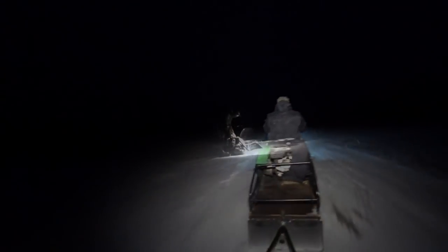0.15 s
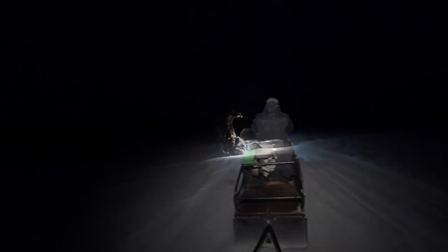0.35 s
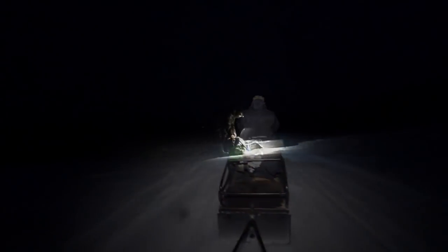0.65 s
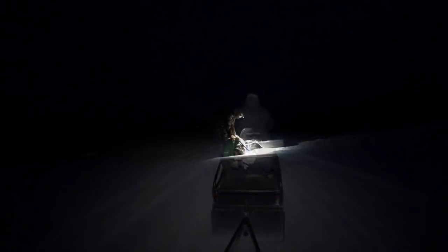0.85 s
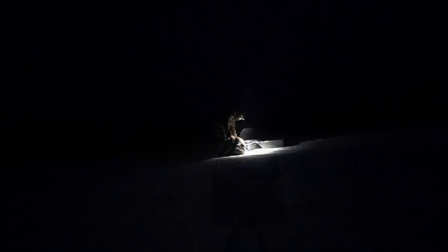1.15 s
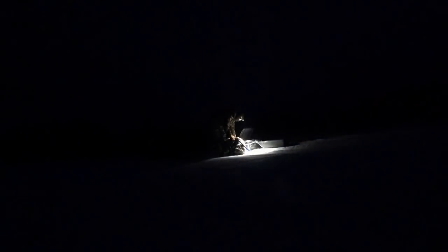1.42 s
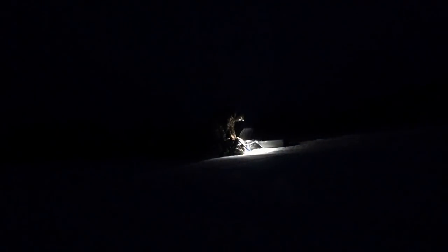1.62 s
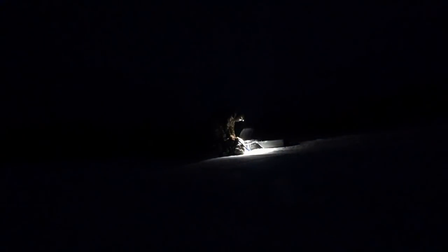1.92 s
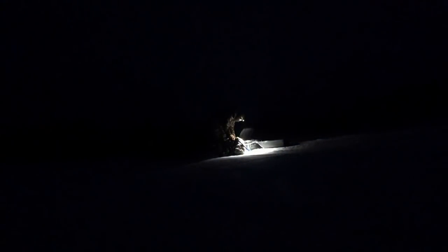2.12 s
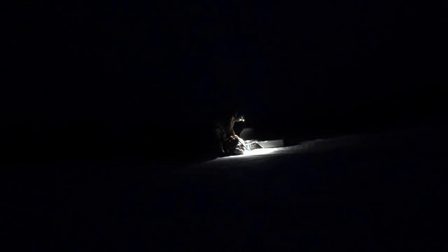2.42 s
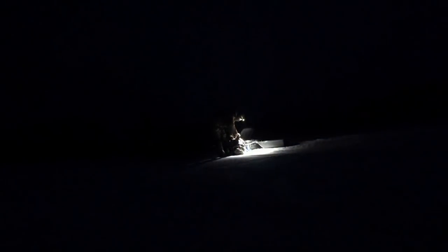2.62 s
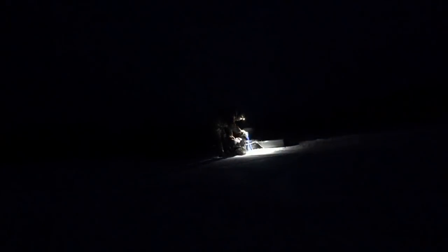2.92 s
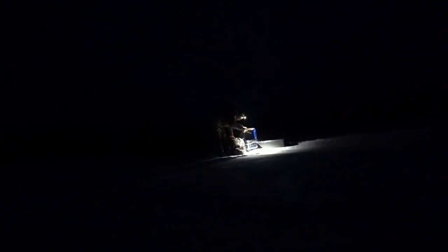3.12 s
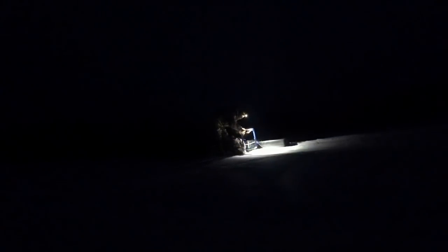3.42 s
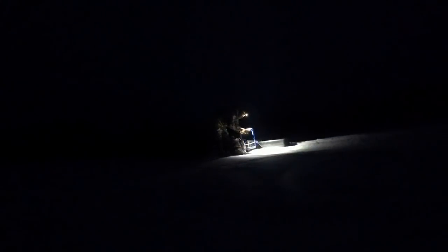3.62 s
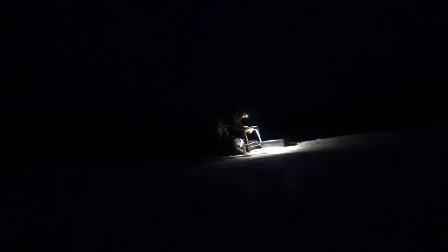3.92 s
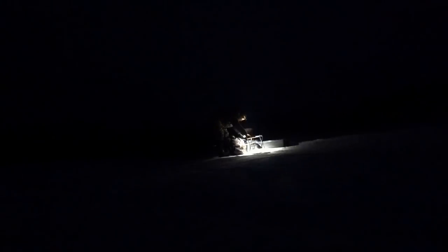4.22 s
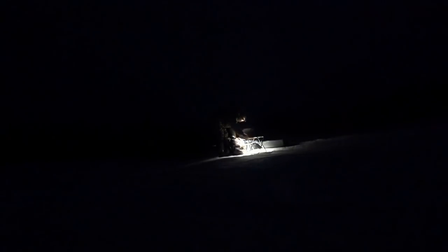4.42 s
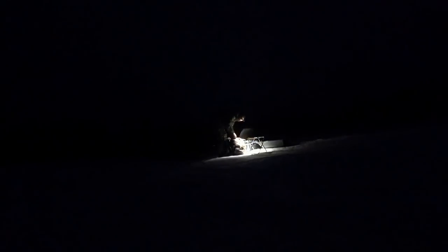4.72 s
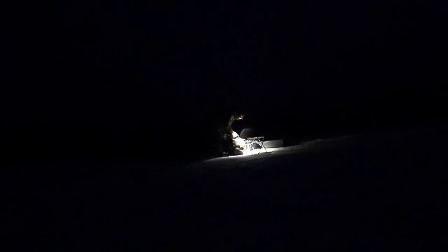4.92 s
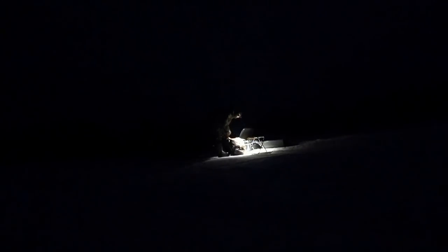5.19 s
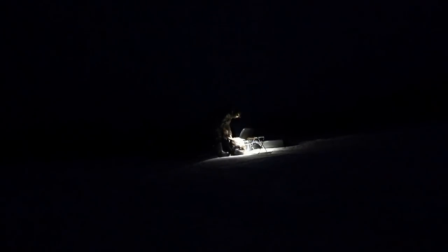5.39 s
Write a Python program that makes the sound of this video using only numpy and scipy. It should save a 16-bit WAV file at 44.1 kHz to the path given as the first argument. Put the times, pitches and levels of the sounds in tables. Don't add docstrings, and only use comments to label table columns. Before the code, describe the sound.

A small tracked snow vehicle's rough engine drone fades out within about a second, then faint metal clinks, scrapes and soft knocks in quiet night air.

```python
import sys
import numpy as np
from scipy import signal
from scipy.fft import rfft, irfft
from scipy.io import wavfile
from scipy.ndimage import uniform_filter1d

SR = 44100
rng = np.random.default_rng(int(sys.argv[2]) if len(sys.argv) > 2 else 0)


def boost_factor(decibels):
    exponent = np.asarray(decibels, float) / 20
    return 10 ** exponent


def digitize_waveform(pressure):
    field = np.atleast_2d(pressure).T
    bounded = np.clip(field, -1, 1)
    quanta = np.round(bounded * 32767).astype(np.int16)
    wavfile.write(sys.argv[1], SR, quanta)


N = 244755
T = np.arange(N) / SR
HZ = np.fft.rfftfreq(N, 1 / SR)


def level(x, db):
    return x * boost_factor(db) / np.sqrt(np.mean(x ** 2))


def on_hz(table):
    hz, value = np.transpose(table)
    return np.interp(np.log(HZ + 1), np.log(hz + 1), value)


def shape(x, gain):
    return irfft(rfft(x) * gain, N)


def bell(hz, width):
    return 1 / (1 + 1j * (HZ ** 2 - hz ** 2) / (width * (HZ + 1)))


def walk(rate):
    hold = int(SR / rate)
    steps = np.repeat(rng.standard_normal(N // hold + 1), hold)
    return 1.31 * uniform_filter1d(uniform_filter1d(steps, hold), hold)[:N]


def flicker(x, shared_db, own_db, rate):
    octave, bins = np.log2(HZ + 1), rfft(x)
    out = 0
    for k in range(4, 15):
        band = irfft(bins * np.clip(1 - abs(octave - k), 0, 1), N)
        out = out + boost_factor(shared_db + own_db * walk(rate)) * band
    return out


def swell(rows):
    return sum(boost_factor(db) * np.exp(-(2 * (T - s) / length) ** 2) for s, length, db in rows)


def ports(a, b, alike, balance, lead=0):
    alike = np.clip(on_hz(alike), -.99, .99)
    mid, side = rfft(a) * np.sqrt(1 + alike), rfft(b) * np.sqrt(1 - alike)
    tilt = boost_factor(on_hz(balance) / 2) * np.exp(.5j * lead)
    return np.array([irfft((mid + side) * tilt, N), irfft((mid - side) / tilt, N)])


def pan(db):
    return boost_factor(np.array([[db], [-db]]) / 2)


def add(out, x, s, pan_db):
    i = int(s * SR)
    out[:, i:i + x.shape[-1]] += (x * pan(pan_db))[:, :N - i]


def camera(x):
    return irfft(rfft(x) * boost_factor(-55 * np.clip((HZ - 10960) / 140, 0, 1)), N)


def thin(x, share):
    pair = np.pad([x[0] + x[1], x[0] - x[1]], ((0, 0), (366, 0)))
    hz, _, z = signal.stft(pair, SR, "cosine", nperseg=2048)
    power = abs(z) ** 2
    local = uniform_filter1d(power, size=16, axis=1)
    keep = power > share * np.clip(hz / 5500, .1, 1)[:, None] * local
    mid, side = signal.istft(z * keep, SR, "cosine", nperseg=2048)[1][:, 366:366 + N]
    return np.array([mid + side, mid - side]) / 2


def sinking(heard, region, db):
    dulling_db_s = -1
    return heard + (boost_factor(db + dulling_db_s * T) - 1) * np.array([shape(c, region) for c in heard])


# (multiple of firing rate, level [dB])
EXHAUST_TONES = [(1, -12), (2, 1), (3, -3), (4, 1.3), (5, 2.5), (6, 3), (7, -7.5), (8, -5), (9, -1),
                 (10, -6.5), (11, -1.5), (12, -11.5), (13, -6), (14, -4.5), (15, -14.5), (16, -18.5),
                 (17, -5.5), (18, -4), (19, -8), (20, -8.5)]
# (frequency [Hz], density [dB per Hz])
ROAR_COLOUR = [(12, -36), (20, -3.5), (33, 0), (124, -0.5), (340, -6.5), (480, -5), (533, -6), (955, -9),
               (1240, -13.5), (1540, -15), (1950, -13), (2410, -10.5), (3140, -18), (4210, -17),
               (11200, -33.5), (14600, -81), (22000, -120)]
# (frequency [Hz], width [Hz], lift [dB])
HULL_MODES = [(952, 70, 2), (1540, 380, 5), (2354, 134, 2.5), (2475, 210, 3), (2800, 42, 6.5),
              (2890, 18, 4.5), (3610, 390, 4), (4130, 210, 4), (6440, 880, 4.5)]
# (frequency [Hz], left lead [rad])
ROAR_PORT_LEAD = [(0, 0), (520, .7), (2670, -.4), (3100, 0), (4130, -.1), (5600, -1.1), (7060, -1.1),
                  (8610, -2.6), (11400, -4.5)]
# (frequency [Hz], left minus right [dB])
ROAR_PORT_BALANCE = [(60, -3), (110, -4), (190, -3.0), (340, -2.5), (610, -1), (1100, -3.5), (1960, -4),
                     (3510, -7), (6280, -6.0), (11200, -3)]
# (frequency [Hz], common share [0-1])
ROAR_PORT_ALIKE = [(30, .9), (300, .92), (2000, .93), (4000, .84), (8000, .6)]
# (frequency [Hz], level [dB rms])
GEAR_WHINE = [(780.6, -59), (963.6, -37), (1147, -41.5), (1459, -49), (2320, -38), (2740, -56),
              (2891, -56.5)]
CYCLE_HZ, ENGINE_DB = 23.07, -20
FADE_FROM_S, FADE_TO_S, CUT_S = 0.083, 1.267, 1.2255


def vehicle():
    fade = np.clip((FADE_TO_S - T) / (FADE_TO_S - FADE_FROM_S), 0, 1) * (T < CUT_S)
    phase = np.cumsum(CYCLE_HZ * (1 + 0.0027 * walk(3.2))) / SR
    tones = 0
    for k, db in EXHAUST_TONES:
        unsteady_db = walk(7.4) * min(k / 4, 3)
        tones = tones + boost_factor(db + unsteady_db) * np.sin(2 * np.pi * (k * phase + rng.random()))
    gate = 1 + 0.11 * np.cos(2 * np.pi * phase)
    gate = gate + 0.11 * np.cos(10 * np.pi * phase) + 0.093 * np.cos(12 * np.pi * phase)
    lift_db = sum(db * abs(bell(hz, width)) ** 2 for hz, width, db in HULL_MODES)
    hull = boost_factor(on_hz(ROAR_COLOUR) + lift_db - 9 * np.clip((170 - HZ) / 50, 0, 1))
    parts = []
    for _ in range(2):
        slaps = (rng.random(N) < 1500 / SR) * rng.standard_normal(N) * boost_factor(1.5 * rng.exponential(size=N))
        roar = gate * (rng.standard_normal(N) + level(slaps, -14.5))
        parts.append(level(flicker(shape(roar, hull), .5 * walk(5.1), 1.0, 9.5), 0))
    whine = 0
    for hz, db in GEAR_WHINE:
        turns = np.cumsum(hz * (1 + 0.0028 * walk(14.8))) / SR
        whine = whine + boost_factor(db + 2 * walk(10)) * np.sin(2 * np.pi * turns)
    parts[0] = parts[0] + level(tones, -5.0) + level(whine, -14.5)
    lead = np.interp(HZ, *np.transpose(ROAR_PORT_LEAD))
    heard = ports(*parts, ROAR_PORT_ALIKE, ROAR_PORT_BALANCE, lead)
    heard = sinking(heard, HZ > 5000, -1.63)
    heard = sinking(heard, HZ < 600, -0.4)
    heard = camera(thin(heard, share=0.65))
    return heard / np.std(heard.mean(axis=0)[T < CUT_S]) * boost_factor(ENGINE_DB) * fade


# (time [s], peak level [dB], strongest ring [Hz], treble [dB])
SINGLE_CLINKS = [(1.698, -56.5, 2900, -23), (1.8106, -54.5, 2030, -18), (2.055, -42, 4000, -2),
                 (2.0594, -50, 1930, -30), (2.3044, -34, 2640, -9), (2.306, -43, 5220, -19),
                 (2.307, -48, 8500, -10), (2.5053, -42.5, 3880, 1), (2.7067, -50.5, 2050, -27),
                 (2.7688, -53, 6060, -5), (2.8358, -58, 3900, -6), (3.7688, -55, 3710, -18),
                 (3.8915, -40.5, 3700, -18), (3.9007, -39.5, 6300, -8), (3.9262, -45, 6280, -3),
                 (3.9426, -30, 3800, -7), (4.147, -36, 6200, -9), (4.179, -27.5, 3740, -4),
                 (4.1894, -32, 6200, 5), (4.2066, -37, 2530, -5), (4.2975, -19, 3850, -14.5),
                 (4.3064, -37, 2210, -18), (4.3715, -47.5, 3910, -18), (4.3982, -35, 3790, -25),
                 (4.4066, -34.5, 3860, -21), (4.4594, -52, 2600, -16), (4.4715, -48, 2720, -6),
                 (4.4856, -35.5, 2600, -6.5), (4.5124, -51, 2700, -25)]
# (strike time [s], peak level [dB], strongest ring [Hz], treble [dB], graze ring [Hz])
SWINGING_HITS = [
    (2.6427, -33, 2890, -5.5, 2100),
    (2.9923, -39, 2620, -0.5, 1930),
    (3.8811, -40, 6200, -3, 3940),
    (4.1723, -21.5, 3550, -14, 2173),
    (4.2388, -27, 3900, -13, 3760),
    (4.2695, -23.5, 3500, -12.5, 3620),
]
GRAZE_LEAD_S, GRAZE_DB = .0062, -8.5
CHATTER_S, CHATTER_GAP_S, CHATTER_SLOWS = 2.1335, 0.0091, 1.3
CHATTER_DB, CHATTER_SAG_DB = -43, -2.4
CHATTER_HZ, CHATTER_TREBLE_DB = 2720, -48


def contacts():
    rows = SINGLE_CLINKS + [row[:4] for row in SWINGING_HITS]
    for s, db, _, treble_db, graze_hz in SWINGING_HITS:
        rows = rows + [(s - GRAZE_LEAD_S, db + GRAZE_DB, graze_hz, treble_db)]
    for k in range(6):
        s = CHATTER_S + CHATTER_GAP_S * k ** CHATTER_SLOWS
        rows = rows + [(s, CHATTER_DB + CHATTER_SAG_DB * k, CHATTER_HZ, CHATTER_TREBLE_DB)]
    return rows


# (frequency [Hz], level [dB], t60 [s])
FITTING_MODES = [(1900, -10, .03), (2130, -8, .04), (2450, -9, .04), (2650, 0, .09), (2800, -3, .07),
                 (3010, -6, .05), (3620, -4, .05), (3810, 1, .08), (4100, -8, .04), (4590, -11, .025),
                 (5000, -11, .025), (5400, -7, .06), (5750, -11, .03), (6270, -5, .06), (6900, -12, .03),
                 (7300, -10, .04), (7850, -12, .03), (8450, -12, .04), (9400, -13, .03), (10100, -14, .03)]
# (frequency [Hz], density [dB per Hz])
CRACK_COLOUR = [(290, -76), (500, -35), (1370, -16), (1690, -24), (2720, 1.5), (3260, -12), (3710, 2.5),
                (4930, -10), (5400, -11), (8380, -20), (11000, -15.5), (14300, -53), (22000, -120)]
CLINK_PAN_DB = -9.5
RING_T60_S, RING_SHARE, RING_PER_DB, RING_PER_TREBLE_DB, RING_LONGER = .064, .5, -.003, 0.01, .9


def clinks():
    out, t = np.zeros((2, N)), T[:SR // 8]
    n = len(t)
    hz, mode_db, t60 = np.transpose(FITTING_MODES)[:, :, None]
    fine = np.fft.rfftfreq(n, 1 / SR)
    crack_hz, crack_level = np.transpose(CRACK_COLOUR)
    crack_db = np.interp(np.log(fine + 1), np.log(crack_hz), crack_level)
    for s, db, ring_hz, treble_db in contacts():
        ring = RING_SHARE + RING_PER_DB * (db + 40) + RING_PER_TREBLE_DB * (treble_db + 12)
        ring = np.clip(ring, .1, 1)
        ring_t60 = RING_T60_S * (1 + RING_LONGER * (ring - RING_SHARE))
        chance = rng.standard_normal((2, len(hz), 1))
        bounces = (rng.random(n) < 4000 / SR) * rng.standard_normal(n)
        bounces = bounces * np.minimum(t / 0.002, 1) * np.exp(-t / 0.0038)
        bounces[20] = 0.45
        near_db = -11 * np.abs(np.log2(hz / ring_hz)) + (treble_db + 12.5) * (hz > 5000)
        gain = boost_factor(mode_db + near_db + 2.5 * chance[0])
        fade = boost_factor(-60 * t / np.clip(t60 * ring_t60 / 0.08, .01, .09))
        modes = np.sum(gain * np.sin(2 * np.pi * hz * (1 + 0.0169 * chance[1]) * t) * fade, axis=0)
        modes = modes + boost_factor(4) * np.sin(2 * np.pi * ring_hz * t) * boost_factor(-60 * t / ring_t60)
        ringing = modes * np.minimum(t / 0.00048, 1) + 0.4 * signal.fftconvolve(bounces, modes)[:n]
        burst = rng.standard_normal(n) + .5 * rng.standard_normal((2, n))
        burst = burst * uniform_filter1d(abs(bounces), size=24)
        crack_gain = boost_factor(crack_db + (treble_db + 13.0) * (fine > 5000))
        crack = irfft(rfft(np.roll(burst, 24, axis=1)) * crack_gain, n)
        hit = ring * ringing / abs(ringing).max() + (1 - ring) * crack / abs(crack).max()
        add(out, hit * boost_factor(db) / abs(hit).max(), s, CLINK_PAN_DB)
    return out


# (time [s], hold [s], level [dB], treble [dB])
METAL_SCRAPES = [
    (2.14, 0.052, -68.5, -16),
    (2.19, 0.059, -74, -14),
    (2.648, .006, -57, 8),
    (3.88, 0.017, -57, -4),
    (3.943, 0.0044, -55, 8),
    (4.163, 0.024, -51, 11),
    (4.203, 0.11, -56.5, 3),
    (4.4, 0.0066, -60.5, 8),
    (4.466, .035, -62, 5.5),
]
SCRAPE_RISE_DB_S, SCRAPE_FALL_DB_S = 1100, 450


def scrapes():
    ticks = (rng.random(N) < 2500 / SR) * rng.standard_normal(N) * boost_factor(2 * rng.exponential(size=N))
    low_gain = bell(2780, 240) * bell(2600, 550) + bell(2640, 250) * bell(2400, 600) + 0.39 * bell(1140, 970)
    high_gain = bell(4500, 290) * bell(4000, 790) + 0.71 * bell(5500, 3400) ** 2
    low, high = level(shape(ticks, low_gain), 0), level(shape(ticks, high_gain), 0)
    out = 0
    for s, hold, db, treble_db in METAL_SCRAPES:
        away_db = SCRAPE_RISE_DB_S * np.clip(s - T, 0, 1) + SCRAPE_FALL_DB_S * np.clip(T - s - hold, 0, 1)
        out = out + boost_factor(db - away_db) * (low + boost_factor(treble_db - 12) * high)
    return out * pan(CLINK_PAN_DB)


# (time [s], peak level [dB], thud [Hz], tick [dB])
GLOVE_KNOCKS = [(2.554, -52, 155, 4), (2.566, -52.5, 232, 5), (2.904, -54, 151, 2.5), (2.989, -53, 163, 10),
                (4.147, -47, 105, 0), (4.172, -43.5, 133, 7), (4.238, -52, 68, 18), (4.288, -48, 200, -1.5),
                (4.722, -62, 34.5, 11.5), (4.751, -45.5, 123, 2), (4.92, -60.5, 181, 8),
                (5.034, -51, 32.3, -2.5), (5.077, -59, 32.3, 2.5)]
# (time [s], peak level [dB], thud [Hz])
SOFT_PUFFS = [(2.918, -59, 59), (3.604, -43, 40), (4.852, -51.5, 31.7), (5.105, -53, 40),
              (5.154, -52.5, 45.5), (5.176, -45, 30.6), (5.263, -55, 48), (5.31, -42.5, 36),
              (5.34, -49, 34.8), (5.4, -50, 56), (5.421, -46.5, 51), (5.455, -51, 121), (5.503, -54, 46.3),
              (5.532, -46.5, 140)]
PUFF_TICK_DB, KNOCK_PAN_DB, PUFF_PAN_DB = -9.5, -2, -3.5


def knocks():
    out, t = np.zeros((2, N)), T[:SR // 8]
    dull = signal.butter(2, [500, 3300], "band", fs=SR, output="sos")
    rows = [(*row, KNOCK_PAN_DB) for row in GLOVE_KNOCKS]
    rows = rows + [(*row, PUFF_TICK_DB, PUFF_PAN_DB) for row in SOFT_PUFFS]
    for s, db, thud_hz, tick_db, pan_db in rows:
        age = (np.pi * (thud_hz * t - .45)) ** 2
        thud = (2 * age - 1) * np.exp(-age) * np.minimum(4 * thud_hz * t, 1)
        tick = rng.standard_normal(len(t)) * np.exp(-t / 0.007) * np.minimum(t / 0.001, 1)
        tick = signal.sosfilt(dull, tick)
        add(out, boost_factor(db) * (thud + boost_factor(tick_db - 1.5) * tick / abs(tick).max()), s, pan_db)
    return out


# (middle time [s], length [s], level [dB])
WIND_GUSTS = [
    (3.5, 0.64, -76),
    (4.3, .2, -65),
    (4.85, 0.71, -68.5),
    (5.2, .2, -66),
    (5.43, 0.16, -57.5),
]
BREEZE_DB, BREEZE_SWING_DB = -73.5, 2


def wind():
    gain = bell(25, 36) * bell(27, 70)
    mid, side = (level(shape(rng.standard_normal(N), gain), 0) for _ in range(2))
    strength = boost_factor(BREEZE_DB + BREEZE_SWING_DB * walk(3.1)) + swell(WIND_GUSTS)
    return strength * (mid + .2 * side * np.array([[1], [-1]]))


# (frequency [Hz], density [dB per Hz])
HISS_COLOUR = [(35, -23.5), (60, -4), (110, -8), (170, -8), (300, -9), (600, -8), (1000, -10.5),
               (1800, -11.5), (3200, -16.5), (4300, -17), (5200, -21.5), (8000, -23.5), (10000, -21),
               (11200, -23)]
# (frequency [Hz], left-right correlation [-1 to 1])
HISS_PORT_ALIKE = [(60, 0.83), (130, 0.93), (270, -0.23), (570, -0.68), (1190, -0.54), (2520, -0.093),
                   (5320, 0.051), (11200, 0.23)]
# (frequency [Hz], left minus right [dB])
HISS_PORT_BALANCE = [(60, 0), (110, -1.0), (190, -2), (340, 1), (610, -1), (1100, 2), (1960, 0),
                     (3510, -2.5), (6280, -2), (11200, -4)]
# (frequency [Hz], level [dB rms])
SENSOR_WHISTLES = [(5981, -93.5), (7612, -95), (9889, -91.5), (9921, -90), (10142, -95.5), (10503, -91.5)]
# (middle time [s], length [s], level [dB])
ARM_MOVES = [
    (2.6, .5, -60),
    (3.65, 0.54, -65),
    (4.4, 0.33, -61),
    (5.0, 1, -63.5),
]
HISS_DB = -63


def night():
    resonance = abs(1 + 1.32 * bell(1440, 280) ** 2 + 0.54 * bell(2900, 180) + 0.39 * bell(2380, 250))
    colour = boost_factor(on_hz(HISS_COLOUR)) * resonance
    a, b = (level(flicker(shape(rng.standard_normal(N), colour), 1.0 * walk(5.2), 1.4, 9), 0) for _ in range(2))
    hiss = ports(a, b, HISS_PORT_ALIKE, HISS_PORT_BALANCE)
    hiss = hiss / np.std(hiss.mean(axis=0)) * boost_factor(HISS_DB)
    grains = (rng.random(N) < 600 / SR) * rng.standard_normal(N) * boost_factor(2.0 * rng.exponential(size=N))
    rustle = level(shape(grains, bell(2160, 1800) ** 2 + 0.58 * bell(570, 500)), 0)
    rustle = rustle * swell(ARM_MOVES) * boost_factor(-7.0)
    whistles = sum(1.6 * boost_factor(db + 3.3 * walk(13)) * np.sin(2 * np.pi * hz * T) for hz, db in SENSOR_WHISTLES)
    return hiss + (rustle + whistles) * pan(-3)


def scene():
    engine = vehicle()
    near = clinks() + scrapes() + knocks()
    tail = rng.standard_normal((2, SR // 5)) * boost_factor(-60 * T[:SR // 5] / 0.096) * boost_factor(-33.5)
    near = near + signal.fftconvolve(near, tail, axes=1)[:, :N]
    return engine + camera(near + wind() + thin(night(), share=0.59))


def top_cut(x):
    return signal.sosfilt(signal.butter(12, 11840, fs=SR, output="sos"), x)


def record(dry):
    return top_cut(dry)


dry = scene()
out = record(dry)
digitize_waveform(out)
```